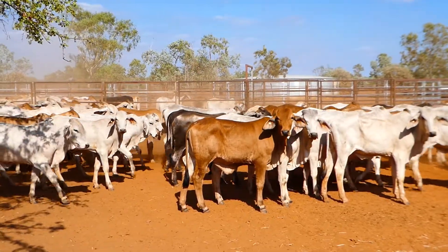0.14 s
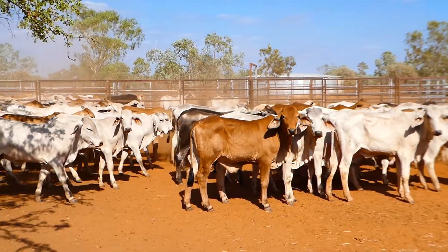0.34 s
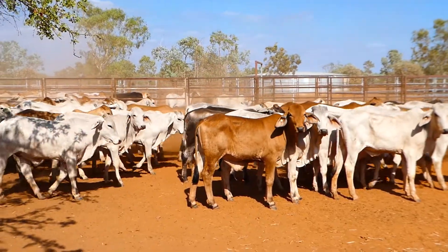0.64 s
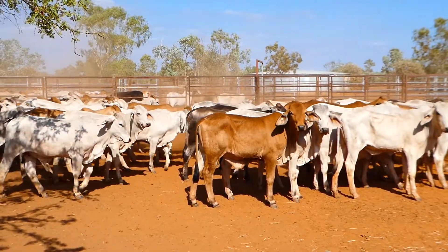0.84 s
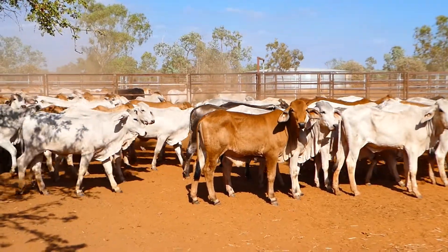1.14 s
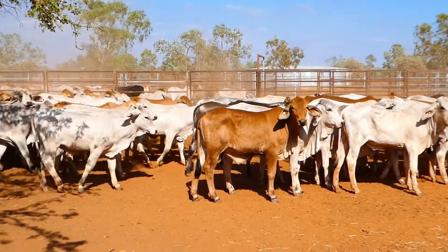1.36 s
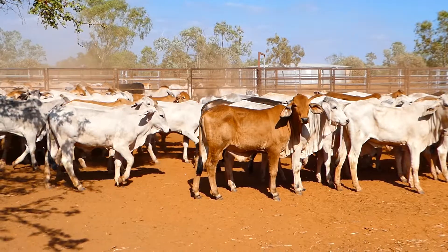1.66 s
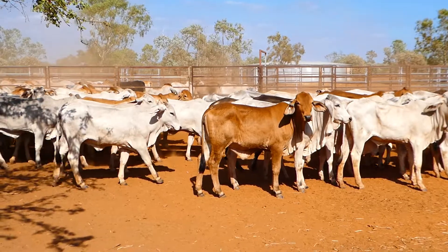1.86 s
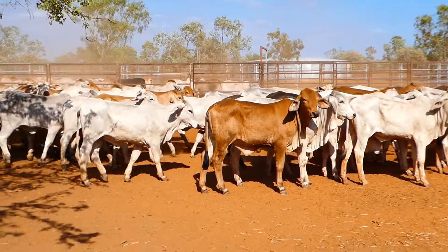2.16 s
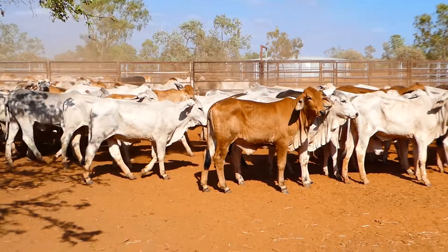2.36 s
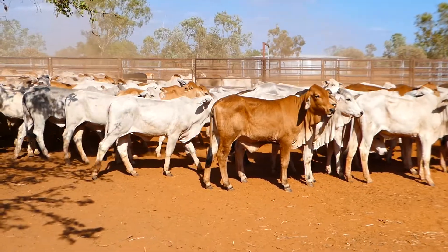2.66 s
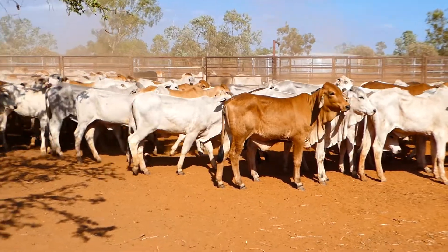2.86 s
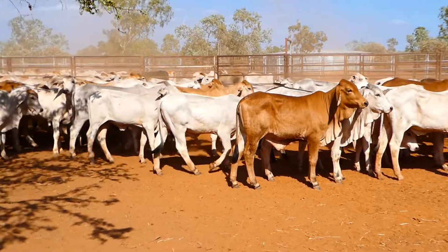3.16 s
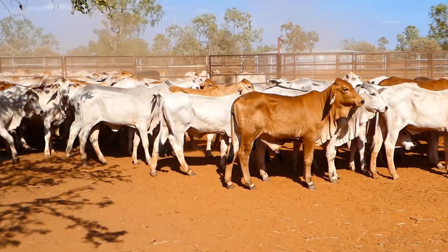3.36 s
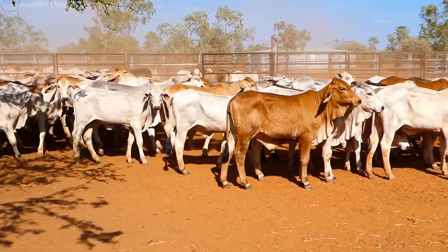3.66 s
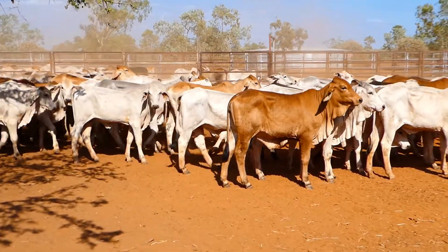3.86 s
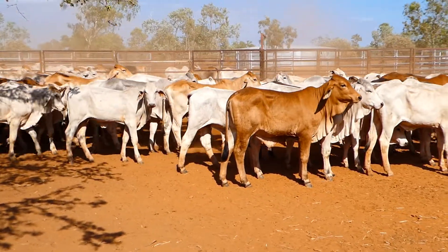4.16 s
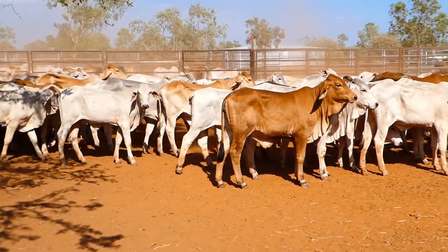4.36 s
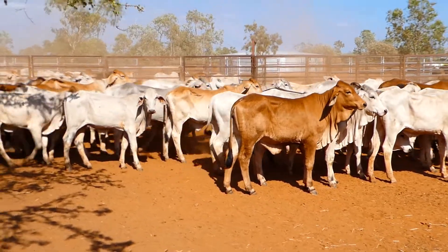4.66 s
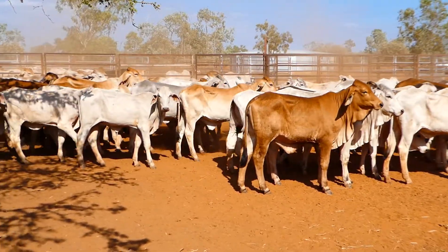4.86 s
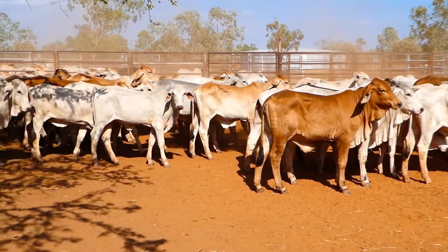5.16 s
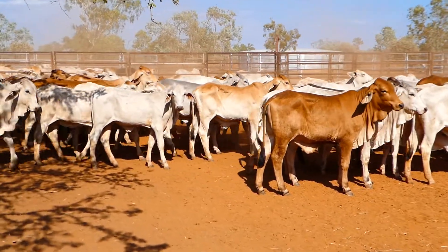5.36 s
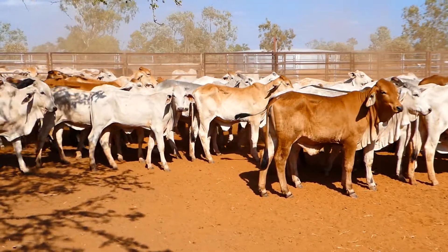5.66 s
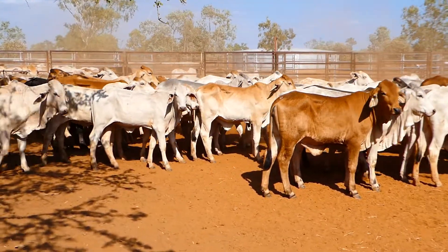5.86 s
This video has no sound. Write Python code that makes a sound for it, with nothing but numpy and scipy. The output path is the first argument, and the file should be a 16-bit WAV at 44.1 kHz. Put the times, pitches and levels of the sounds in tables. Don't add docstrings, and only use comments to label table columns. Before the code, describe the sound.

Outdoors in a dusty cattle yard, a low rough moo swells and sags in pitch, then a fainter, higher one overlaps it. A loud, strong moo follows close by, then another slides downward into a tiny grunt. Hooves scuff dirt, twigs snap, and wind thumps the small stereo microphones. Small birds chirp far off before late wind bumps and knocks.

```python
import sys
import numpy as np
from scipy import signal
from scipy.io import wavfile
from scipy.ndimage import uniform_filter1d

SR = 44100
rng = np.random.default_rng(int(sys.argv[2]) if len(sys.argv) > 2 else 0)


def gain_from_db(level_db):
    decades = np.asarray(level_db, float) / 20
    return 10 ** decades


def persist_wave(psi):
    counts = np.round(np.clip(psi, -1, 1) * 32767).astype(np.int16)
    wavfile.write(sys.argv[1], SR, np.atleast_2d(counts).T)


N = 265482


def evened(x):
    return x / np.sqrt(np.mean(x ** 2) + 1e-20)


def smoothed(x, size):
    return uniform_filter1d(uniform_filter1d(x, size), size)


def wander(count, size):
    return evened(smoothed(rng.standard_normal(count), size))


def read(points, hz):
    f, value = np.transpose(points)
    return np.interp(np.log(hz + 1), np.log(f + 1), value)


def add(mix, s, sound, pan_db):
    part = mix[:, max(round(s * SR), 0):][:, :len(sound)]
    part += sound[:part.shape[1]] * gain_from_db(np.array([[pan_db / 2], [-pan_db / 2]]))


def resonate(x, hz, width):
    turn = np.exp(2j * np.pi * np.cumsum(hz * np.ones(len(x))) / SR)
    r = np.exp(-2 * np.pi * width / SR)
    smooth = signal.lfilter([(1 - r) ** 3], np.poly([r, r, r]), x / turn)
    return 2 * (turn * smooth).real


def noise(colour, same, patchy_db):
    frames, hz = N // 256 + 5, np.fft.rfftfreq(1024, 1 / SR)
    a, b, c, d, patches = rng.standard_normal((frames, 513, 5)).T
    patches = uniform_filter1d(patches, size=10, axis=0)
    patches = evened(uniform_filter1d(patches, size=10, axis=1))
    same = np.clip(same * np.ones(513), -1, 1)[:, None]
    left = a + 1j * b
    right = same * left + np.sqrt(1 - same ** 2) * (c + 1j * d)
    z = np.array([left, right]) * gain_from_db(read(colour, hz)[:, None] + patchy_db * patches)
    return evened(signal.istft(z, nperseg=1024, noverlap=768)[1][:, :N])


def swells(rows, floor_db):
    t = np.arange(N) / SR
    peaks = sum(gain_from_db(2 * db - 40 * abs(t - s) / abs(span)) for s, db, span in rows)
    return np.sqrt(gain_from_db(2 * floor_db) + peaks)


def vocal_folds(hz, rough, strain):
    count, jitter, uneven_db = len(hz), 0.04, 6
    turns = np.cumsum(hz * (1 + jitter * rough * wander(N // 2, size=300)[:count])) / SR
    top = 11000 / hz
    away = (turns + .5) % 1 - .5
    folds = np.sinc(2 * top * away) * np.exp(-(top * away / 3) ** 2) * top ** .5
    folds = folds * gain_from_db(4.0 * rough * wander(N // 2, size=400)[:count])
    beat = np.floor(turns + .5).astype(int)
    folds = folds * gain_from_db(uneven_db * strain * (0.4 * (-1) ** beat + rng.standard_normal(1000)[beat]))
    puffs = (0.74 + np.exp(-(turns % 1) / .4)) * rng.standard_normal(N // 2)[:count]
    return folds, puffs


def bounces(folds, path):
    # (delay [s], level [dB])
    returns = [(.0031, 1.5), (.0068, 0), (.0104, 0), (0.015, -2.5)]
    paths = np.zeros(1000)
    paths[0] = 1
    for k, (delay, db) in enumerate(returns):
        paths[round(delay * path * SR)] = (-1) ** k * gain_from_db(db)
    return signal.oaconvolve(folds, paths)[:len(folds)] - folds


def moo(mix, pitch, effort, tongue, strains, voice, throat, pan_db):
    s, *columns = np.transpose(effort)
    t = np.arange(s[0], s[-1], 1 / SR)
    effort_db, hum_db, facing_db, stretch = (np.interp(t, s, c) for c in columns)
    when, *shape = np.transpose(tongue)
    mouth_tilt, rasp_tilt, lift = (np.interp(t, when, c) for c in shape)
    hz = uniform_filter1d(np.interp(t, *np.transpose(pitch)), size=3000, mode="nearest")
    rasp_db, nose_db, dull_db, rough, path = voice
    dulled_db = dull_db * np.log2(hz / hz.max())
    strain = np.interp(t, *np.transpose(strains))
    slide = abs(np.gradient(np.log(hz))) * SR
    rough = np.clip(rough + 0.34 * strain + 0.0814 * slide, 0, 1)
    folds, puffs = vocal_folds(hz, rough, strain)
    bounced = bounces(folds, path)
    edge = signal.windows.tukey(len(t), 0.012)
    levels_db = (hum_db, 0, rasp_db + dulled_db + facing_db, nose_db + 1.45 * dulled_db + 1.44 * facing_db)
    tilts, lifts = (0, mouth_tilt, rasp_tilt, 0), (1, 1, lift, lift)
    breaths, shadows, shares = (.3, .9, 1.3, 4.5), (0.088, 0.94, 1.0, .8), (0.073, 0.25, .5, .8)
    jaws, looseness = (2.03, 1.15, 0.52, 0.12), (0.0023, 0.014, 0.028, 0.026)
    steadies = (0.12, 1.0, 0.28, .9)
    layers = zip(throat, levels_db, tilts, lifts, breaths, shadows, shares, jaws, looseness, steadies)
    for modes, rel_db, tilt, lifted, breath, shadow, share, jaw, loose, steadied in layers:
        drive = evened(folds + share * bounced) + breath * rough * evened(puffs)
        rung = 0
        for k, (f, width, db) in enumerate(modes):
            drift = 1 + loose * wander(N // 2, size=5000)[:len(t)]
            gain = (-1) ** k * gain_from_db(db + tilt * np.log2(f / modes[1][0]))
            rung = rung + gain * resonate(drive, f * lifted * stretch ** jaw * drift, width)
        rung = evened(rung)
        rung /= (abs(smoothed(rung ** 2, 2000)) + 1e-12) ** (steadied / 2)
        add(mix, s[0], gain_from_db(effort_db + rel_db) * edge * rung, shadow * pan_db)


def cattle():
    # (time [s], pitch [Hz])
    pitch_long = [(0.03, 77.83), (0.29, 83.35), (0.59, 84.27), (0.72, 82.87), (0.83, 78.7), (1.1, 56.66),
                  (1.33, 53.06), (2.11, 48.13), (2.2, 47)]
    pitch_far = [(1.95, 94.16), (2.134, 102.8), (2.264, 109.6), (2.365, 105.3), (2.489, 104),
                 (2.597, 107.7), (2.674, 106.8), (2.78, 103.4)]
    pitch_loud = [(2.66, 87.7), (2.774, 99.1), (3.056, 120.2), (3.16, 122.9), (3.413, 124.1),
                  (3.707, 121.2), (3.864, 102.5), (3.914, 85.76), (4.029, 62.75)]
    pitch_last = [(3.98, 127.3), (4.142, 117.4), (4.32, 100), (4.492, 86.43), (4.562, 80), (4.64, 64.55),
                  (4.756, 56.5), (4.8, 54.2)]
    pitch_grunt = [(4.82, 54.35), (4.95, 50.86), (5.109, 46.17), (5.26, 43.33)]
    # (time [s], effort [dB], hum through closed lips over effort [dB],
    #  treble as the muzzle turns to the microphones [dB], jaw opening [factor on the throat])
    effort_long = [(0.0, -46, 2, -1, 0.97), (0.12, -37.5, 5, -4, 1.03), (0.5, -32.5, -1, 1.5, 1.01),
                   (0.75, -28.5, 4, 2.5, 1.044), (0.83, -22, -0.5, 0.5, 1.016),
                   (1.15, -23.5, -2.5, -1.5, 0.98), (1.38, -27, -4.5, 0, 0.9914), (2.1, -32, 0, -0.5, 0.95),
                   (2.25, -42, 10, -3, 0.93)]
    effort_far = [(1.95, -49, 8.5, -12, 1.1), (2.131, -38, 2.5, -2.5, 1.02),
                  (2.27, -32.5, -3.5, -5.5, 1.01), (2.369, -34, 4, -1, 0.99),
                  (2.6, -35.5, 4.5, -0.5, 1.014), (2.73, -28.5, -1, 0.5, 0.99), (2.78, -46, 15, 18.5, 0.96)]
    effort_loud = [(2.655, -26, 2, -2, 0.97), (2.665, -24.5, -6, -1, 1.055), (2.74, -23, -2, 3, 1.026),
                   (2.93, -18, -7.5, -0.5, 1.027), (3.09, -21, -7, -4.5, 1.011),
                   (3.2, -18, -6.5, -1, 1.005), (3.64, -19.5, -5.5, 0.5, 1.008),
                   (3.9, -19, -8, -1.5, 1.026), (4.1, -37.5, -2.5, 25.5, 1.01)]
    effort_last = [(3.93, -43, 10, 8.5, 1.07), (4.04, -29, 3, -3, 1.043), (4.181, -26.5, 4, -0.5, 1.006),
                   (4.27, -31, 12, -2.5, 1.036), (4.42, -25, -1.5, -3.5, 1.015), (4.56, -27.5, 3.5, -4, 1),
                   (4.65, -32, 1.5, 1, 0.983), (4.76, -46.5, 14, 6, 0.95), (4.85, -58.5, 10, -0.5, 0.97)]
    effort_grunt = [(4.825, -57, 15, -0.5, 0.92), (4.868, -45.5, 11.3, 0, 0.96),
                    (5.05, -55.5, 16.4, -4, 0.952), (5.17, -60.5, 16, -6, 0.94), (5.25, -79, 12, -6, 0.72)]
    # (centre [Hz], width [Hz], level [dB])
    throat_long = [
        [(299.2, 37.7, 12), (253, 120, -13.5), (530, 130, -12)],
        [(704, 55, 10), (886, 128, 4), (1096, 76, 7), (1290, 199, -2.5)],
        [(1864, 95, 6), (2160, 170, 4.5), (2573, 154, -5.5), (2955, 237, -6)],
        [(4150, 1100, -3.5), (5366, 380, -3.5), (6200, 240, -1.5)],
    ]
    throat_far = [
        [(298, 47, 4.5), (438, 170, -16)],
        [(781, 74, -1.5), (1032, 88, 1), (1350, 106, -17)],
        [(1740, 560, 15), (2270, 110, -13), (2900, 240, -2.5)],
        [(4480, 500, 0), (6300, 360, -9)],
    ]
    throat_loud = [
        [(275.6, 39.8, 10), (395, 64, -10)],
        [(778.3, 58.8, 16), (977.5, 92, 7.5), (1223, 210, -5)],
        [(1923, 150, 0.5), (2266, 198, 7), (2613, 86, -1), (2850, 175, -5)],
        [(3740, 580, -4.5), (4680, 160, 0.5), (5850, 400, 2), (6500, 230, 1), (9760, 1260, -14)],
    ]
    throat_last = [
        [(304.8, 39, 3), (230, 97, -19), (448, 52, -13)],
        [(666, 78, 9.7), (1008, 87, 7.9), (1214, 77, 0.95), (832, 63, 0.59)],
        [(1796, 240, 6), (2066, 90, 7), (2450, 243, -3), (2700, 237, -3.5), (3160, 170, -10)],
        [(4560, 370, 3.5), (5700, 280, 3)],
    ]
    throat_grunt = [
        [(289.4, 32, 8), (200, 78, -23), (450, 75, -12.5)],
        [(690, 40, 13), (1065, 73, 1), (1460, 200, -3)],
        [(1790, 300, 4), (2450, 300, -6)],
        [(4530, 340, 3.5), (5770, 280, 3)],
    ]
    # (time [s], mouth tilt [dB per octave], rasp tilt [dB per octave], lift [factor on rasp and nose])
    tongues = [
        [(0.0, 7, -7, 0.98), (.2, 0.5, -15, 0.984), (.56, 0, 3, 0.987), (.75, 3.5, -4.5, 1.01),
         (.85, -5, 4, 0.993), (1.04, 1.5, 1, 1.013), (1.3, -4, 0, 0.986), (1.8, 2.5, 9, 0.984),
         (2.08, 10.5, 6, 1.016)],
        [(1.95, -6, 2, 1.0), (2.3, -1, -6, 0.94), (2.78, .1, 7, 1.0)],
        [(2.65, -5, -6, .97), (2.85, -2.5, -7, 0.982), (3.0, -4, 1, 1.018), (3.18, 7.5, 3.5, 0.99),
         (3.32, -1, -2, 0.988), (3.5, 4, 6, 1.01), (3.68, 4.5, 5.5, 1.04), (3.85, -0.5, 26, 1.063),
         (4.0, -3, 7, 1.03)],
        [(3.95, 17, 2, 1.014), (4.15, 0.5, 1, 1.006), (4.3, 1, -5.5, 0.983), (4.5, 1.5, 5.5, 0.98),
         (4.7, -5, -4.5, 0.986), (4.85, -17, -4, 0.87)],
        [(4.82, .1, .1, 1.0), (4.95, -2, -2, 0.85), (5.2, 1, .1, 1.0)],
    ]
    # (time [s], strain [0-1])
    strains = [
        [(0, 0), (.8, 0), (1.0, .35), (1.28, .3), (1.4, .03), (2.25, .05)],
        [(1.95, .1), (2.78, .1)],
        [(2.65, .3), (2.85, .1), (3.1, 0), (3.72, 0), (3.78, .5), (4.1, .6)],
        [(3.93, .05), (4.4, .05), (4.55, .25), (4.85, .15)],
        [(4.82, .1), (5.25, .15)],
    ]
    # (rasp over effort [dB], nose over effort [dB], their loss as pitch sags [dB per octave],
    #  roughness [0-1], bounce path [factor on the delays])
    voices = [
        (-14, -28.5, 11, 0.078, .95),
        (-11.5, -33, 3.7, 0.13, 1.05),
        (-14, -29, 24.6, 0.084, .98),
        (-13, -32.5, 7.6, .07, 1.03),
        (-11, -26, 5, 0.032, 0.78),
    ]
    places = [
        -7.5,
        -2,
        -7.5,
        -8,
        -9,
    ]
    pitches = pitch_long, pitch_far, pitch_loud, pitch_last, pitch_grunt
    efforts = effort_long, effort_far, effort_loud, effort_last, effort_grunt
    throats = throat_long, throat_far, throat_loud, throat_last, throat_grunt
    out = np.zeros((2, N))
    for animal in zip(pitches, efforts, tongues, strains, voices, throats, places):
        moo(out, *animal)
    return out


def echoes(x, t60):
    count = 12000
    taps = rng.choice([-1., 1.], (2, count)) * (rng.random((2, count)) < .05)
    taps *= gain_from_db(-60 * np.arange(count) / SR / t60)
    taps[:, :300] = 0
    return signal.fftconvolve(x, taps / np.linalg.norm(taps[0]), axes=1)[:, :N]


def wind():
    # (time [s], peak [dB], time to rise or fall by 20 dB [s])
    gusts = [(0.0, -24, 0.24), (0.232, -15, 0.064), (0.36, -36, 0.1), (0.7, -51.5, -0.5), (1.33, -39, 0.3),
             (1.52, -33.5, 0.67), (1.8, -52.5, -2), (2.03, -41, 0.3), (2.13, -44.5, -0.15),
             (2.27, -27.5, 0.4), (2.45, -29.5, 0.1), (2.52, -30.5, -0.46), (2.88, -36.5, 0.5),
             (3.35, -40.5, 0.9), (3.67, -42.5, -0.1), (4.5, -50, 1.9), (5.0, -59, 1.6), (5.585, -51, 0.24),
             (5.642, -49, 0.24), (5.745, -48, -0.2), (5.785, -37, -0.11), (5.84, -39, -0.1),
             (5.89, -27.5, -0.02), (5.935, -27, -0.04), (5.975, -34.5, -0.08), (6.02, -44.5, 0.12)]
    # (frequency [Hz], level [dB per Hz])
    gust_colour = [(30, -45), (60, -22.5), (95, -2), (150, -3), (250, 3.5), (340, -2.5), (500, -11.5),
                   (900, -24.5), (1500, -73.5)]
    # (time [s], peak [dB], centre [Hz], left-right [dB])
    buffets = [(0.206, -20, 270, 3.5), (0.243, -21, 196, -3), (2.222, -17.5, 183, 2), (2.246, -20, 182, -2),
               (2.297, -19, 280, 7), (2.44, -30, 300, -3), (2.479, -38, 299, -1.5), (5.575, -41, 189.6, 1),
               (5.59, -29, 186, 3), (5.635, -41, 200, -3), (5.766, -30, 255, 2), (5.788, -27.5, 180, 6),
               (5.863, -23, 150, 5.5), (5.884, -20, 188, 4), (5.894, -21.5, 261, 9), (5.906, -22, 200, 2),
               (5.928, -20.5, 227, 7), (5.94, -27.5, 333, 10), (5.972, -26, 200, 5)]
    rumble = noise(gust_colour, 0.19, patchy_db=4.0)
    out = rumble * swells(gusts, floor_db=-73.5) * gain_from_db(1.2 * wander(N, size=300))
    t = np.arange(2000) / SR
    for (s, db, hz, pan_db), phase in zip(buffets, rng.random((len(buffets), 1))):
        u = t * hz / 1.11
        swell = u * np.exp(1 - u ** 1.82)
        add(out, s, gain_from_db(db) * swell * np.sin(2 * np.pi * (hz * t + phase)), pan_db)
    return out


def hooves():
    # (time [s], peak [dB], time to rise or fall by 20 dB [s])
    hisses = [(0.78, -54.5, -0.5), (1.02, -58.5, -0.7), (1.36, -55.5, 0.67), (2.03, -58.5, 2.1),
              (2.5, -63.5, 3.5), (2.78, -57.5, -0.5), (2.98, -53.5, 0.7), (3.14, -55, 0.5),
              (3.42, -50, 0.5), (3.72, -50, 0.2336), (4.1, -57.5, .15), (4.54, -54.5, 0.77),
              (5.38, -61, 0.36), (6.0, -58.5, 0.5)]
    # (frequency [Hz], level [dB per Hz])
    hiss_colour = [(1500, -37.5), (3000, 2), (5000, -5), (7000, -6), (8300, -11.5), (10000, -12),
                   (13000, -16), (15500, -27.5)]
    # (time [s], peak [dB], centre [Hz], t60 [s], left-right [dB])
    snaps = [(.292, -47.5, 9100, 0.008, -5), (1.7944, -24.5, 10330, 0.0056, 3.5),
             (1.7955, -31.5, 2700, 0.051, -7), (3.253, -35, 5700, 0.0088, -9), (4.524, -58, 6000, 0.022, 2),
             (4.79, -45, 3530, 0.099, -3), (5.676, -34, 7960, 0.022, 0), (5.675, -28.5, 2700, 0.06, 1.5),
             (5.843, -27.5, 790, 0.058, 1.5), (5.844, -35, 2200, 0.05, -4), (5.888, -46, 9000, 0.023, 4),
             (5.958, -34.5, 806, 0.028, 2)]
    grains = gain_from_db(3.5 * np.minimum(rng.exponential(1, N), 4)) * (rng.random(N) < 1500 / SR)
    grit = evened(0.98 + uniform_filter1d(grains, size=30) * 8)
    hiss = noise(hiss_colour, .25, patchy_db=1.5)
    out = hiss * grit * swells(hisses, floor_db=-78.5) * gain_from_db(2.6 * wander(N, size=900))
    t = np.arange(3000) / SR
    tick, width = 4.4, 0.45
    for (s, db, hz, t60, pan_db), crack in zip(snaps, rng.standard_normal((len(snaps), len(t)))):
        crack = (crack + tick * (t == 0)) * gain_from_db(-60 * t / t60)
        burst = resonate(crack, hz, width * hz)
        add(out, s, gain_from_db(db) * burst / abs(burst).max(), pan_db)
    return out


def birds():
    # (time [s], length [s], start [Hz], end [Hz], level [dB])
    chirps = [(4.599, .03, 3550, 3400, -49), (4.599, 0.027, 4300, 4550, -53),
              (4.611, 0.055, 3700, 3900, -47.5), (4.84, 0.085, 2900, 2450, -50),
              (5.028, .03, 2830, 2870, -56.5), (5.207, 0.028, 3470, 3500, -55),
              (5.36, .07, 5270, 5600, -63), (5.383, 0.045, 2700, 2800, -56),
              (2.845, 0.046, 3840, 3610, -44)]
    out = np.zeros((2, N))
    for s, length, start_hz, end_hz, db in chirps:
        hz = np.linspace(start_hz, end_hz, round(length * SR))
        note = np.sin(2 * np.pi * np.cumsum(hz) / SR) * np.hanning(len(hz))
        add(out, s, gain_from_db(db) * note, 0)
    return out


def yard():
    # (frequency [Hz], level [dB per Hz])
    air_colour = [(40, -29), (100, 4), (200, 5), (400, 0), (800, -2), (1600, -7.5), (2500, -10),
                  (4000, -18.5), (6300, -19.5), (8200, -25.5), (10000, -20.5), (13000, -32), (15500, -40.5)]
    # (frequency [Hz], left-right likeness [clipped to -1 to 1])
    likeness = [(60, -0.2), (150, -2.5), (390, -0.03), (1010, 0.2), (2600, 0.72)]
    same = read(likeness, np.fft.rfftfreq(1024, 1 / SR))
    return gain_from_db(-50) * noise(air_colour, same, patchy_db=1.2)


def scene():
    voices = cattle() + birds()
    scattered = gain_from_db(-20) * echoes(voices, t60=.25)
    return voices + scattered + hooves() + wind() + yard()


def band_limit(x):
    return signal.sosfilt(signal.butter(12, 15300, fs=SR, output="sos"), x)


def record(dry):
    bass_cut = signal.butter(2, 70, "high", fs=SR, output="sos")
    mix = signal.sosfilt(bass_cut, dry)
    return band_limit(mix)


dry = scene()
out = record(dry)
persist_wave(out)
```